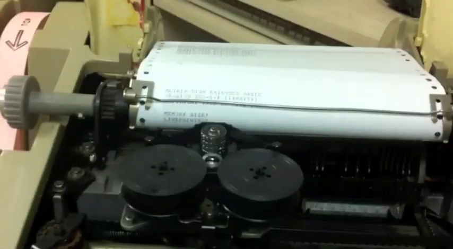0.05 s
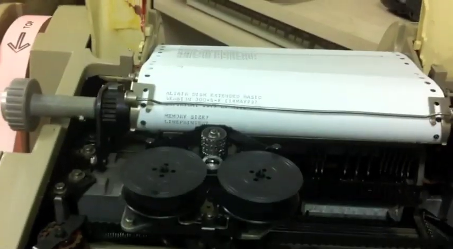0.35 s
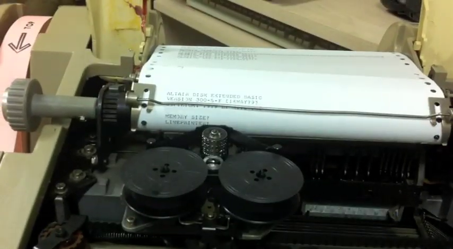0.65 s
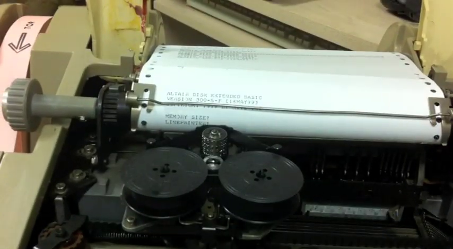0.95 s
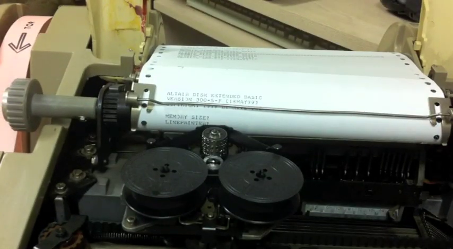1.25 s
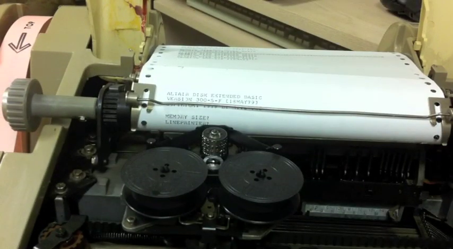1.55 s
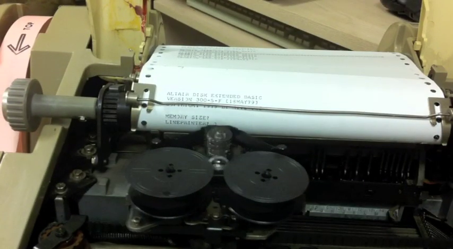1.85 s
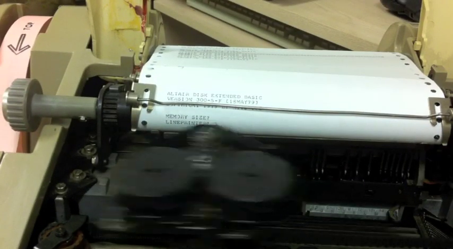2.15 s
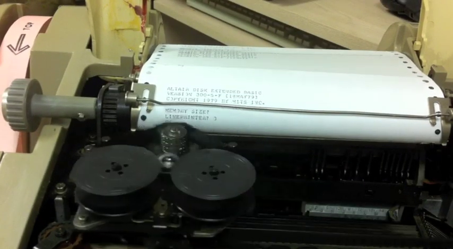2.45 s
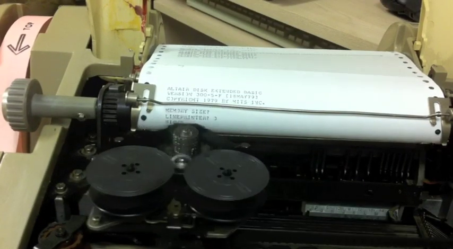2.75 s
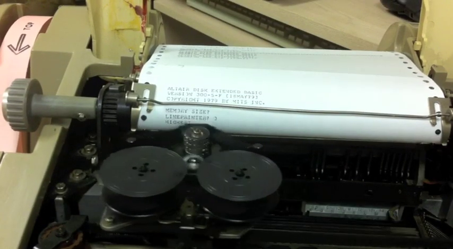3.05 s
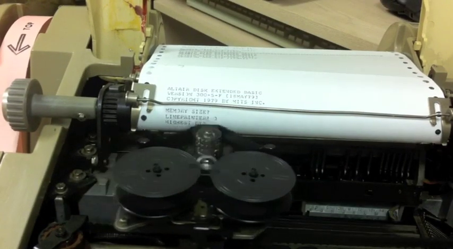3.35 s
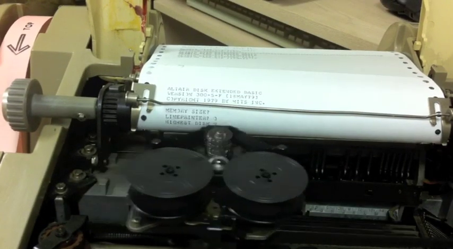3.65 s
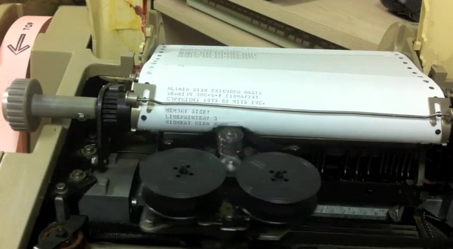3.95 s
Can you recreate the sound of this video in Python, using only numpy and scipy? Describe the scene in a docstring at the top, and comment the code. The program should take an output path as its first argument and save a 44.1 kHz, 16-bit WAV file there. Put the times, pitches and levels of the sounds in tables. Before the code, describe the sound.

A teleprinter idles with a motor hum, clunks a few times, then clatters rapidly.

```python
"""Teletype printer in a small room

The microphone stands close to the machine. It finishes a character, idles on its humming motor, trips
its clutch for a few single cycles, returns the carriage and then prints ten characters a second.
In every cycle the links rattle, the type wheel clacks into place, the hammer strikes, the frame thumps."""
import sys
import numpy as np
from scipy import signal
from scipy.fft import rfft, irfft
from scipy.io import wavfile
from scipy.ndimage import uniform_filter1d

SR = 44100
rng = np.random.default_rng(int(sys.argv[2]) if len(sys.argv) > 2 else 0)


def unload_wav(signal):
    """Save mono or channel-first audio to the path in sys.argv[1] as 16-bit WAV at rate SR, clipped to [-1, 1]."""
    wavfile.write(
        sys.argv[1],
        SR,
        np.round(np.clip(np.atleast_2d(signal).T, -1, 1) * 32767).astype(np.int16),
    )


N = 176400

FIRST_CYCLE_S, CYCLE_S = 2.3, .1
LATCH_AT_S, WHEEL_AT_S, HAMMER_AT_S, TYPE_AT_S, STEP_AT_S = .002, .0288, .0422, .0441, .0567
CLICK_RISE_S, BELT_HZ = .0007, 11.3

# The printed characters. Each row: latch, wheel stop, hammer, type, carriage step, wheel swing, all in dB.
CHARACTERS = [(-28, -40, -40, -40, -24, -3), (-27, -14.5, -24, -14.5, -15, -1.5),
              (-22, -14, -26, -16, -16, -2.5), (-22, -17, -32, -14.5, -16, -4),
              (-24, -19, -20, -14.5, -21, -0.5), (-15, -14, -20, -15.5, -17, -0.5),
              (-15, -18, -22, -20, -12.5, 1.5), (-20, -13, -24, -29, -17, 0),
              (-25, -34, -38, -36, -13.5, -4.5), (-21, -12, -11.5, -15, -23, 0.5),
              (-21, -18, -14.5, -13, -17, 0.5), (-13.5, -13.5, -23, -22, -16, 0.5),
              (-12.5, -11.5, -10, -17, -22, 0.5), (-28, -32, -36, -32, -14, -4),
              (-16, -24, -8.5, -18, -21, 1.5), (-13, -11, -26, -18, -18, 1.5),
              (-14, -13.5, -8, -13, -16, 0.5)]
# Loose chatter while the main shaft is engaged. Each row: start and end in seconds, level in dB.
ENGAGED_SPELLS = [(0, 0.11, -25.5), (1.703, 1.788, -33), (1.8, 2.012, -29.5), (2.039, 2.169, -33.5),
                  (2.182, 4.013, -28)]
# Motor and gear hum. Each row: frequency in Hz, level in dB.
HUM_TONES = [(120, -54.5), (200.2, -52.5), (240.1, -33.5), (420.1, -73), (480.4, -60), (540.3, -53),
             (800.3, -53), (1080.5, -60)]
# Gear ticks. Each row: start and decay in seconds, level in dB.
TURN_TICKS = [(.013, .003, -36.5), (.0175, .002, -43), (.0295, .0035, -35), (.038, .009, -42.5)]  # timed within each turn of the idling shaft
LONE_TICKS = [(0.680, .003, -41), (1.343, .006, -33.5)]
# Rattling blows. Each row: start, rise and decay in seconds, then links, type wheel and casing in dB.
CYCLE_STROKES = [(.001, 0.00044, 0.011, -21, -21.5, -24), (.025, 0.0024, 0.0036, -17, -47, -25),
                 (.031, 0.0018, 0.018, -19, -22, -29.5), (.0425, 0.00048, 0.0057, -37, -22.5, -24),
                 (.0562, 0.00024, 0.0064, -20, -20.5, -26), (.0618, 0.00036, 0.017, -17.5, -24.5, -27),
                 (.074, .002, .01, -19.5, -25.5, -25.5), (.083, 0.0033, 0.012, -17.5, -44, -32),
                 (.089, 0.0017, 0.007, -20, -22, -28.5), (.094, .001, 0.0053, -34, -22, -24)]  # levers, timed within each printing cycle
LONE_BLOWS = [(.001, 0.0017, 0.022, -16.5, -22, -21.5), (.044, 0.003, 0.031, -40, -37, -24.5),
              (.075, 0.001, 0.015, -21, -19.5, -21), (.11, .002, 0.0076, -51, -60, -27),
              (1.571, .002, .005, -44, -60, -58), (1.6845, 0.0033, 0.011, -20, -25, -14),
              (1.7755, 0.00071, 0.0069, -26, -27, -20), (1.785, 0.0087, 0.018, -20.5, -38, -20),
              (1.802, 0.0047, 0.014, -30, -24, -25), (1.856, 0.00075, 0.0063, -20.5, -26, -23),
              (1.883, 0.002, 0.04, -21, -26, -28), (1.9275, 0.0042, 0.014, -16.5, -18, -24),
              (1.956, 0.0013, 0.024, -19, -23, -21), (1.986, 0.0043, 0.014, -17, -44, -18.5),
              (2.076, 0.00057, 0.0034, -28, -28, -20), (2.085, 0.0059, 0.0099, -18.5, -32, -21.5),
              (2.099, 0.0036, 0.017, -17, -22, -23), (2.175, 0.00064, 0.0056, -17.5, -27, -28),
              (2.183, 0.0042, 0.051, -19.5, -26.5, -30), (2.202, 0.00063, 0.0036, -14.5, -41, -38),
              (2.215, 0.016, 0.023, -20, -28, -29), (2.255, 0.0024, 0.038, -20.5, -22.5, -25.5),
              (2.2845, 0.0012, 0.008, -10.5, -29, -37), (2.296, 0.00089, 0.0031, -14, -17, -35),
              (2.348, .0007, 0.013, -12.5, -36, -20), (2.631, 0.0018, .006, -13, -24, -28),
              (3.1558, 0.00066, 0.0055, -16.5, -22, -28), (3.226, .0007, .005, -14, -29, -31),
              (3.6568, .0007, .006, -23, -17, -30)]  # clutch, levers and returning carriage
# Thumps of the cams. Each row: start in seconds, frame level in dB, platen level in dB.
CYCLE_THUMPS = [(.005, -33, -58), (.019, -28.5, -34), (.029, -33.5, -41), (.043, -34.5, -49),
                (.068, -42, -38), (.081, -32.5, -40), (.0905, -27.5, -24)]  # timed within each printing cycle
LONE_THUMPS = [(.005, -24, -18.5), (.114, -32, -24.5), (1.688, -42, -35), (1.792, -34, -41),
               (1.895, -27, -26.5), (1.992, -37, -38), (2.093, -39, -50), (2.191, -25.5, -24.5),
               (2.289, -24, -23)]
# Jolts of the table. Each row: start, rise and decay in seconds, level in dB.
TABLE_JOLTS = [(1.685, .01, .09, -50), (2.06, .02, 0.12, -50.5)]
# Single hits. Each row: start in seconds, level in dB.
LONE_STEPS = [(.0757, -20), (.088, -24), (1.929, -19)]
CLUTCH_HITS = [(1.689, -29.5), (1.808, -27.5), (1.995, -22), (2.094, -24.5)]
LEVER_BOUNCES = [(1.7125, -14), (2.012, -15)]
LONE_HAMMER = [(1.9425, -8.5)]
CARRIAGE_HITS = [(2.256, -15.5), (2.286, -24), (2.296, -17.5), (2.395, -19)]
# Colours of the parts at the microphone. Each row: frequency in Hz, relative spectral density in dB.
AIR_COLOUR = [(30, -31), (80, -21.5), (150, -25.5), (225, 14), (350, 0), (520, 4), (880, -5), (1200, 0.5),
              (1700, -10.5), (3400, -9), (4200, -17), (8000, -24), (16000, -29)]
GEAR_COLOUR = [(200, -26), (700, -6), (1200, 0.5), (1700, 2.5), (2600, 5.5), (3600, 4), (4200, -10),
               (5500, -7), (8000, -11), (16000, -22.5)]
LINK_COLOUR = [(100, -35), (400, -15.5), (900, -10.5), (1400, -7.5), (2500, -7.5), (4000, 1), (6000, 1),
               (8000, 2), (12000, 0.5), (16000, 0.5)]
WHEEL_COLOUR = [(200, -37.5), (900, -15), (1700, -15.5), (2150, -2), (2600, 0.5), (3200, -5.5),
                (4200, -10.5), (8000, -13), (16000, -14.5)]
CASING_COLOUR = [(40, -21), (90, -11.5), (170, 0), (300, 4.5), (650, -0.5), (920, -7), (1250, 2),
                 (1800, -2), (3000, -6), (6000, -16), (16000, -5.5)]
TABLE_COLOUR = [(20, -1), (45, -9), (90, 0), (200, -11), (600, -34), (16000, -70)]
# Modes of the ringing parts. Each row: frequency in Hz, seconds to fade by 60 dB, relative level in dB.
STEEL_MODES = [(1380, 0.095, 0), (1953, 0.13, 9), (2260, 0.041, -8), (2500, 0.023, -3), (2670, 0.17, -6),
               (2960, 0.072, -1), (3130, 0.07, -17), (3350, 0.17, 8.5), (3980, 0.045, 3), (5600, 0.12, -5),
               (6000, 0.18, 4), (6940, 0.093, -6), (8540, 0.049, -6), (8420, 0.057, 11)]
FRAME_MODES = [(145, 0.058, -11.5), (207.3, 0.16, -10.5), (281, 0.076, -5.5), (293.5, 0.067, -5),
               (320, 0.092, -19)]
PLATEN_MODES = [(508, 0.07, 1), (470, 0.02, -11), (612, .03, -10.5), (796, 0.18, -19.5)]
CLUTCH_MODES = [(814, 0.16, -10), (1209, 0.065, 1.5), (1380, 0.046, 0), (1915, 0.04, 3)]
HAMMER_MODES = [(1400, .012, -15), (2480, .014, -7), (3780, .014, -10), (4480, .01, -9), (5870, .016, 1),
                (6250, .008, -10)]
CARRIAGE_MODES = [(2200, .03, -8), (2665, 0.04, 2.5), (3100, .03, -7)]
# Modes of the short clacks. Each row: frequency in Hz, swell in seconds, relative level in dB.
PAWL_MODES = [(2480, .001, -1), (2950, .0008, -5)]
WHEEL_STOP_MODES = [(2230, .0008, -1), (2750, .0005, -7), (3200, .0006, -8)]
TYPE_MODES = [(1350, .0008, -12), (2450, .001, -.5), (4100, .0007, -9)]


def undb(db):
    """Decibels to gain."""
    return 10 ** (np.asarray(db) / 20)


def unit(x):
    """Scale a response to unit energy."""
    return x / np.sqrt(np.sum(x ** 2))


def through(x, response):
    """Pass a sound through an impulse response."""
    return signal.fftconvolve(x, response)[:N]


def low_cut(x, hz, order):
    """Roll off the bass."""
    return signal.sosfilt(signal.butter(order, hz, "high", fs=SR, output="sos"), x)


def colour(points, size=4096):
    """Causal response of unit energy with the given spectrum."""
    hz, db = np.array(points).T
    grid = np.maximum(np.fft.rfftfreq(size, 1 / SR), 1)
    cepstrum = irfft(np.log(undb(np.interp(np.log(grid), np.log(hz), db))))
    cepstrum[1:size // 2] *= 2  # fold to minimum phase
    cepstrum[size // 2 + 1:] = 0
    return unit(irfft(np.exp(rfft(cepstrum))))


def ring(modes):
    """Response of a struck part: a sum of fading sines."""
    t = np.arange(SR // 4) / SR
    return sum(undb(db) * np.sin(2 * np.pi * hz * t) * np.exp(-np.log(1000) * t / t60)
               for hz, t60, db in modes)


def drift(rate_hz):
    """Smooth random drift with a spread near 1."""
    hold = int(SR / rate_hz)
    return uniform_filter1d(np.repeat(rng.standard_normal(N // hold + 1), hold), hold)[:N]


def contacts(power, hold=12, spread_db=.5):
    """Dense tiny metal contacts of uneven size that follow a power envelope."""
    size_db = spread_db * np.clip(rng.standard_normal(N // hold + 1), -2, 2)
    size = np.repeat(undb(size_db), hold)[:N]
    return np.sqrt(power) * rng.standard_normal(N) * size / np.sqrt(np.mean(size ** 2))


def rattle(blows):
    """Each blow sets off a flurry of contacts that dies away."""
    power, t = np.zeros(N), np.arange(SR // 6) / SR
    for start, rise, decay, db in blows:
        i = int(np.clip(start * SR, 0, N - 1))
        shape = np.minimum(t / rise, 1) * np.exp(-np.maximum(t - rise, 0) / decay)
        power[i:i + len(t)] += (undb(db) * shape[:N - i]) ** 2
    return contacts(power)


def knocks(hits):
    """One clean push for each hit."""
    out = np.zeros(N)
    for start, db in hits:
        out[int(np.clip(start * SR, 0, N - 1))] += undb(db)
    return out


def clack(hits, modes, pitch_scatter=.03):
    """Each hit swells and dies within a few milliseconds, a little different in pitch every time."""
    out, t = np.zeros(N), np.arange(SR // 80) / SR
    for start, db in hits:
        i = int(start * SR)
        for hz, swell, mode_db in modes:
            detune, phase = rng.standard_normal(2)
            envelope = undb(db + mode_db) * t / swell * np.exp(1 - t / swell)
            tone = np.sin(2 * np.pi * (hz * (1 + pitch_scatter * detune) * t + phase))
            out[i:i + len(t)] += (envelope * tone)[:N - i]
    return out


def cycles():
    """The printing cycles. Each row: start in seconds, then latch, wheel, hammer, type and step in dB."""
    return [(FIRST_CYCLE_S + k * CYCLE_S, *row[:-1]) for k, row in enumerate(CHARACTERS)]


def every_cycle(rows, scatter_s=.0004, scatter_db=1.1, advance_db_per_s=.36):
    """Repeat rows in each cycle, unevenly, louder as the carriage advances."""
    starts = [start for start, *_ in cycles()]
    for start, (*_, swing_db) in zip(starts, CHARACTERS):
        for at, *rest in rows:
            late, loud = rng.standard_normal(2)
            db = scatter_db * loud + advance_db_per_s * (start - np.mean(starts))
            db += swing_db * (.02 < at < .05)  # while the type wheel swings
            yield start + at + scatter_s * late, db, rest


def engaged(levels):
    """A control that takes one value in each spell of the engaged main shaft and is 0 at idle."""
    t = np.arange(N) / SR
    steps = sum(level * ((t >= start) & (t < end))
                for (start, end, _), level in zip(ENGAGED_SPELLS, levels))
    return np.maximum(uniform_filter1d(steps, 400), 0)


def belt_drag(t, peak_s=.51):
    """Drag of the drive belt, 0 to 1, peaking once a turn."""
    return np.cos(np.pi * BELT_HZ * (t - peak_s)) ** 8


def motor_hum(waver_db=1, waver_rad=.1, flutter_rad=.22, loaded_db=-6.5, belt_dip_db=4.5):
    """The motor hums, less under load, and the belt makes it flutter."""
    t = np.arange(N) / SR
    flutter = flutter_rad * np.sin(2 * np.pi * BELT_HZ * t)
    hum = 0
    for hz, db in HUM_TONES:
        amplitude = np.sqrt(2) * undb(db + waver_db * drift(30.2))
        phase = 2 * np.pi * (hz * t + rng.random()) + flutter + waver_rad * drift(17)
        hum += amplitude * np.sin(phase)
    load_db = loaded_db * engaged(np.ones(len(ENGAGED_SPELLS))) - belt_dip_db * belt_drag(t)
    return hum * undb(load_db)


def motor_air(level_db=-43):
    """The motor stirs the air: a faint, wavering rush."""
    return undb(level_db + drift(27.85)) * through(rng.standard_normal(N), colour(AIR_COLOUR))


def gear_ticks(turn_s=.05, belt_db=2, gain_db=-1.3):
    """The gears tick in each turn of the idling shaft, harder when the belt drags."""
    ticks = [(s + at, CLICK_RISE_S, decay, db + belt_db * belt_drag(s + at))
             for s in np.arange(0, N / SR, turn_s) for at, decay, db in TURN_TICKS]
    ticks += [(s, CLICK_RISE_S, decay, db) for s, decay, db in LONE_TICKS]
    return undb(gain_db) * through(rattle(ticks), colour(GEAR_COLOUR))


def levers(latch_decay_s=.0042, stop_decay_s=.0032, bounce_gap_s=.0095, bounce_loss_db=2, ring_db=-20.5):
    """Strokes and blows rattle the bright links, the type wheel and the casing; steel parts ring on."""
    blows = LONE_BLOWS + [(s, rise, decay, *np.add(levels, db))
                          for s, db, (rise, decay, *levels) in every_cycle(CYCLE_STROKES)]
    links = [(s, rise, decay, db) for s, rise, decay, db, _, _ in blows]
    wheel = [(s, rise, decay, db) for s, rise, decay, _, db, _ in blows]
    casing = [(s, rise, decay, db) for s, rise, decay, _, _, db in blows]
    for s, latch_db, stop_db, *_ in cycles():
        links.append((s + LATCH_AT_S, CLICK_RISE_S, latch_decay_s, latch_db))
        links.append((s + WHEEL_AT_S, CLICK_RISE_S, stop_decay_s, stop_db - 3))
    # A loose lever bounces to rest.
    links += [(s + k * bounce_gap_s, CLICK_RISE_S, .0016, db - k * bounce_loss_db)
              for s, db in LEVER_BOUNCES for k in range(7)]
    chatter = contacts(engaged([undb(db) ** 2 for _, _, db in ENGAGED_SPELLS]))
    metal = through(rattle(links) + chatter, colour(LINK_COLOUR))
    metal += through(rattle(wheel), colour(WHEEL_COLOUR))
    metal += through(rattle(casing), colour(CASING_COLOUR))
    return metal + undb(ring_db) * through(metal, unit(ring(STEEL_MODES)))


def cam_thumps(judder_db=-11, decay_s=.007):
    """The cams shake the frame and knock the hollow platen: a push and a short judder each time."""
    blows = LONE_THUMPS + [(s, *np.add(levels, db)) for s, db, levels in every_cycle(CYCLE_THUMPS)]
    frame = [(s, db) for s, db, _ in blows]
    platen = [(s, db) for s, _, db in blows]
    out = 0
    for hits, modes in ((frame, FRAME_MODES), (platen, PLATEN_MODES)):
        judder = rattle([(s, CLICK_RISE_S, decay_s, db) for s, db in hits]) / np.sqrt(decay_s * SR / 2)
        out += through(knocks(hits) + undb(judder_db) * judder, ring(modes))
    return low_cut(out, hz=150, order=5)


def carriage_pawl(gap_s=.0052, loss_db=5.5):
    """The carriage steps and its pawl bounces: three clacks, each weaker than the last."""
    steps = LONE_STEPS + [(s + STEP_AT_S, db) for s, *_, db in cycles()]
    bounces = [(s + k * gap_s * rng.uniform(1.0, 1.2), db - k * loss_db)
               for s, db in steps for k in range(3)]
    return clack(bounces, PAWL_MODES)


def table_jolts():
    """The clutch jolts the table under the machine: a low rumble."""
    return through(rattle(TABLE_JOLTS), colour(TABLE_COLOUR))


def clutch_drum():
    """The clutch drum clanks in the single cycles."""
    return through(knocks(CLUTCH_HITS), ring(CLUTCH_MODES))


def hammer(buzz_db=-9, buzz_decay_s=.003, hard_db=-9, dulling=.47, pivot_hz=2480):
    """The hammer drives the type wheel against the paper: a crack, duller when soft, and a short buzz."""
    hits = LONE_HAMMER + [(s + HAMMER_AT_S, db) for s, _, _, db, *_ in cycles()]
    buzz = rattle([(s, CLICK_RISE_S, buzz_decay_s, db) for s, db in hits])
    out = undb(buzz_db) * through(buzz, unit(ring(HAMMER_MODES)))
    for s, db in hits:
        tilt_db_per_octave = dulling * (db - hard_db)
        crack = ring([(hz, t60, mode_db + db + tilt_db_per_octave * np.log2(hz / pivot_hz))
                      for hz, t60, mode_db in HAMMER_MODES])
        i = int((s + CLICK_RISE_S) * SR)
        out[i:i + len(crack)] += crack[:N - i]
    return out


def carriage_return():
    """The carriage rings as it runs home."""
    return through(knocks(CARRIAGE_HITS), ring(CARRIAGE_MODES))


def type_wheel():
    """Two clacks a character: the wheel stops, then its type meets the platen."""
    stops = [(s + WHEEL_AT_S, db) for s, _, db, *_ in cycles()]
    prints = [(s + TYPE_AT_S, db) for s, *_, db, _ in cycles()]
    return clack(stops, WHEEL_STOP_MODES) + clack(prints, TYPE_MODES)


def room(x, t60_s=.25, first_echo_s=.0053, gain_db=-3.5, paths=6, hold=256):
    """The parts lie all over the machine, so each instant takes one of several paths round the room."""
    t = np.arange(SR // 2) / SR
    fade = np.exp(-np.log(1000) * t / t60_s) * (t > first_echo_s)
    path = np.repeat(rng.integers(0, paths, N // hold + 1), hold)[:N]
    wet = 0
    for k in range(paths):
        share = uniform_filter1d(1. * (path == k), hold)
        wet += through(x * share, unit(rng.standard_normal(len(t)) * fade))
    return undb(gain_db) * wet


def scene(strike_send_db=-7):
    """The machine from close by with the small room behind it, the same in both channels."""
    hum = motor_hum()
    whirr = motor_air() + gear_ticks()
    table = table_jolts()
    metal = levers() + clutch_drum() + carriage_return()
    clatter = low_cut(metal, hz=115, order=3) + whirr  # small parts radiate no bass
    strikes = low_cut(hammer() + carriage_pawl() + type_wheel(), hz=700, order=2)
    echoes = room(clatter + undb(strike_send_db) * strikes)
    mono = clatter + strikes + echoes + cam_thumps() + table + hum
    return np.array([mono, mono])


def record(dry, top_hz=15900):
    """The recorder behind the microphone cuts the top treble steeply."""
    return signal.sosfilt(signal.ellip(12, .1, 80, top_hz, fs=SR, output="sos"), dry)


dry = scene()
out = record(dry)
unload_wav(out)
```